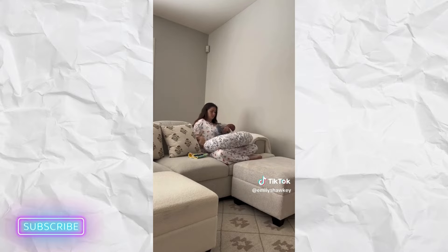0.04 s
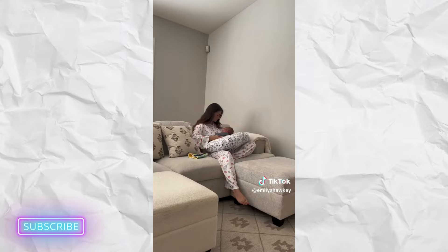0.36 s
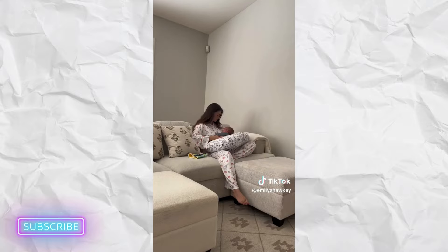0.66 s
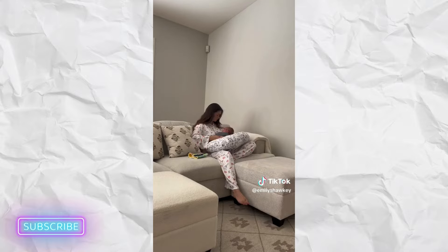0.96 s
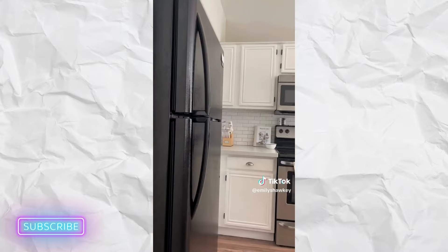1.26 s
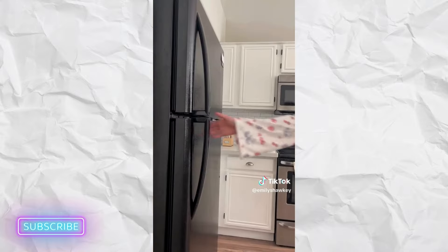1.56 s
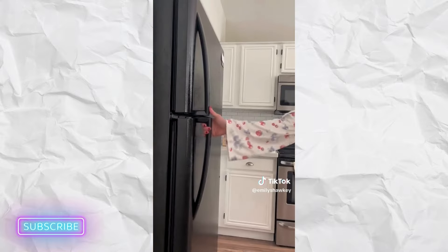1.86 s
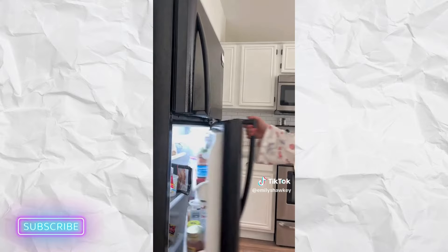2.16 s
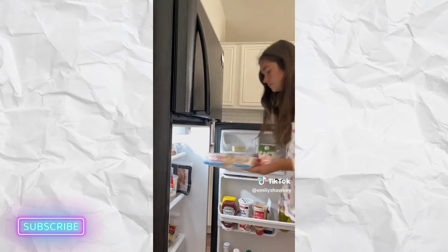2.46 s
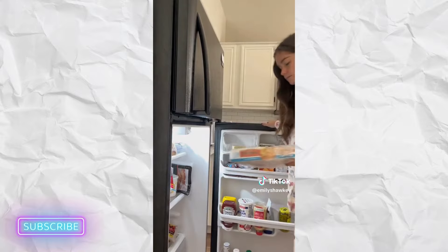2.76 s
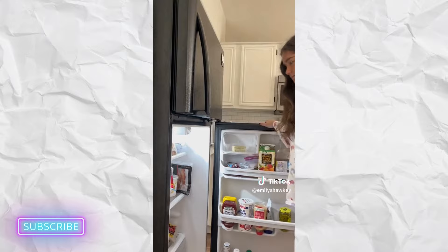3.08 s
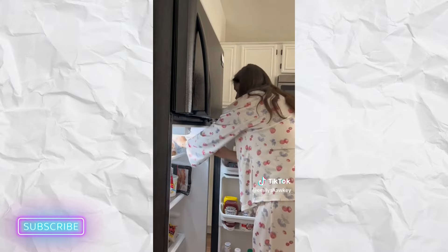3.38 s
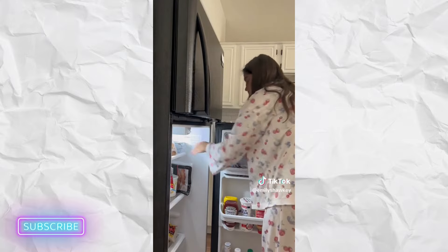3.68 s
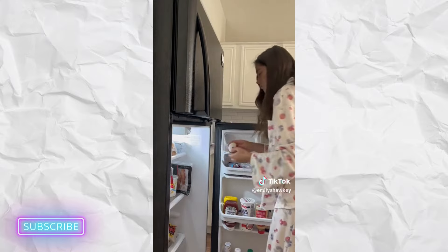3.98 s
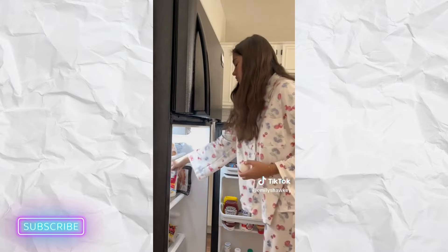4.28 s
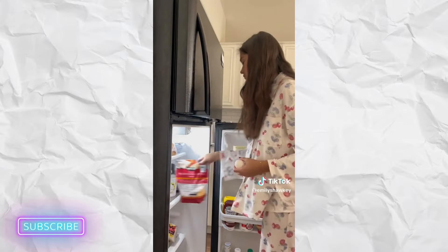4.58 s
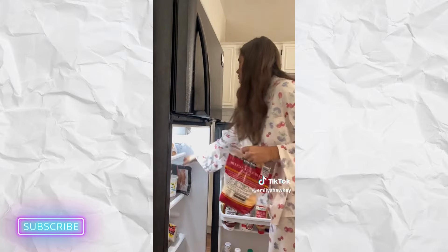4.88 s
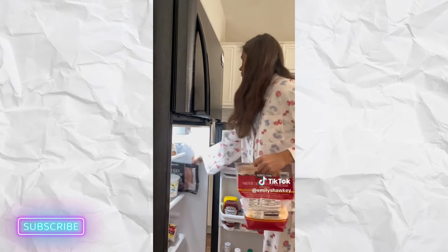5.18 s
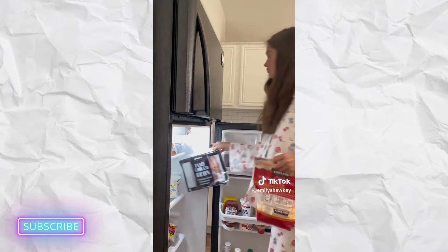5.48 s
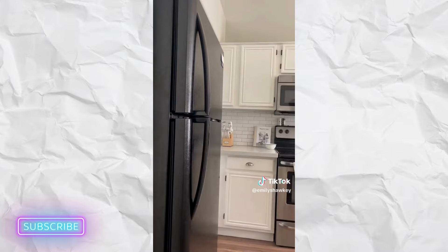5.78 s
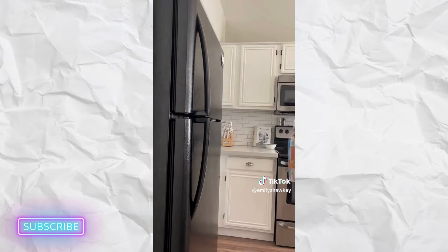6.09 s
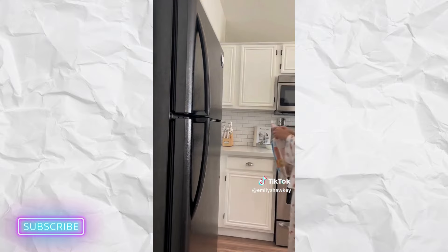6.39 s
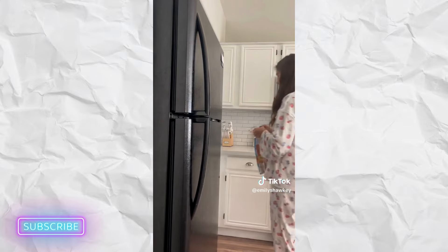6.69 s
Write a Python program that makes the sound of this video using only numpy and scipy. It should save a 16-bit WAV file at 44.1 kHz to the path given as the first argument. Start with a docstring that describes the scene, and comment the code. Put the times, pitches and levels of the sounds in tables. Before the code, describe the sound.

After a faint room hum, a fridge opens with a thud, followed by shelf knocks, crackling bags and rustling clothes.

```python
"""A living room hums for a second, then gives way to a tiled kitchen where a refrigerator is raided.
A hand grips the handle, the rubber seal peels and pops, and the door booms. A tray chatters along its rack,
tubs knock on ringing plastic shelves, a jar clinks and food bags crackle as their film buckles.
Sleeves rustle in fine slips of cotton, and every movement carries the ring of the hard room."""
import sys
import numpy as np
from scipy import signal
from scipy.fft import rfft, irfft, next_fast_len
from scipy.io import wavfile
from scipy.ndimage import uniform_filter1d

SR = 44100
rng = np.random.default_rng(int(sys.argv[2]) if len(sys.argv) > 2 else 0)


def unload_wav(signal):
    """Save mono or channel-first audio to the path in sys.argv[1] as 16-bit WAV at rate SR, clipped to [-1, 1]."""
    wavfile.write(
        sys.argv[1],
        SR,
        np.round(np.clip(np.atleast_2d(signal).T, -1, 1) * 32767).astype(np.int16),
    )


N = 306131
TIME = np.arange(N) / SR

# abrupt steps in the room tone; the kitchen begins at the third (start [s], level [dB])
AIR_STEPS = [(0, -55), (0.101, -61), (1.03, -59.5), (2.3, -61), (3.139, -62.5), (4.035, -57.5), (4.87, -57),
             (5.744, -64)]


def undb(db):
    """Decibels to gain."""
    return 10 ** (np.asarray(db) / 20)


def unit(x):
    """Scale to rms 1."""
    return x / np.sqrt(np.mean(x ** 2))


def on_log(hz, points):
    """Read (frequency [Hz], value) points on a log-frequency axis."""
    point_hz, value = np.transpose(points)
    return np.interp(np.log(np.maximum(hz, 1)), np.log(point_hz), value)


def colour(x, points):
    """EQ by a curve of (frequency [Hz], gain [dB]) points."""
    size = next_fast_len(len(x))
    gain = undb(on_log(np.fft.rfftfreq(size, 1 / SR), points))
    return irfft(rfft(x, size) * gain, size)[:len(x)]


def band(x, lo_hz, hi_hz, order=3):
    """Causal band-pass."""
    sos = signal.butter(order, [lo_hz, min(hi_hz, SR / 2 - 1)], "band", fs=SR, output="sos")
    return signal.sosfilt(sos, x)


def walk(rate_hz):
    """Smooth random drift at rms 1."""
    size = int(SR / rate_hz)
    steps = np.repeat(rng.standard_normal(N // size + 1), size)
    return unit(uniform_filter1d(steps, size)[:N])


def fade(t60, rise):
    """One second of a hit's envelope: it builds during contact and dies away."""
    t = TIME[:SR]
    return (1 - np.exp(-t / rise)) * np.exp(-np.log(1000) * t / t60)


def ring(modes, rise, detune):
    """Struck modes; each point of contact detunes and weights them a little."""
    chance = rng.standard_normal((len(modes), 2))
    return sum(undb(db + stray_db) * fade(t60, rise)
               * np.sin(2 * np.pi * hz * (1 + detune * drift) * TIME[:SR])
               for (hz, db, t60), (drift, stray_db) in zip(modes, chance))


def burst(lo_hz, hi_hz, t60, rise):
    """A crowd of short modes: a band of noise that dies away evenly."""
    noise = band(rng.standard_normal(SR), lo_hz, hi_hz)
    return noise / np.sqrt(uniform_filter1d(noise ** 2, size=SR // 50)) * fade(t60, rise)


def add_hit(track, s, hit, db):
    """Mix in a hit at time s, with its first 20 ms at an rms level of db."""
    start = max(int(s * SR), 0)
    attack_rms = np.sqrt(np.mean(hit[:SR // 50] ** 2))
    track[start:start + len(hit)] += hit[:N - start] * undb(db) / attack_rms


def grains(per_s, spread_db, size=N):
    """Tiny slips and buckles at random moments, uneven in size."""
    size_db = spread_db * np.minimum(rng.exponential(size=size), 4)
    return (rng.random(size) < per_s / SR) * rng.choice([-1, 1], size) * undb(size_db)


def stroke(s, rise, hold, db, release_db_per_s):
    """Envelope of one rub: it swells, holds and dies, choked by any room-tone step over 60 ms in."""
    speed = np.clip((TIME - s) / rise, 0, 1)
    fall_db = release_db_per_s * np.maximum(TIME - s - rise - hold, 0)
    end = min([step for step, _ in AIR_STEPS if step > s + .06] + [np.inf])
    return speed * undb(db - fall_db) * (TIME < end)


def rubbing(strokes, spectrum, release_db_per_s, per_s, spread_db, hiss_db, scrape_db):
    """One stream of grains heard as dull scrape, crackle and fine hiss; bright strokes favour the hiss."""
    slips = colour(grains(per_s, spread_db), spectrum)
    gains = [(stroke(*shape, release_db_per_s), bright_db) for *shape, bright_db in strokes]
    layers = [(0.066, 317, 2500, scrape_db), (0.4, 2380, 5560, 0), (1, 6170, 14400, hiss_db)]
    out = np.zeros(N)
    for bright_share, lo_hz, hi_hz, db in layers:
        power = sum((gain * undb(db + bright_share * bright_db)) ** 2 for gain, bright_db in gains)
        out += unit(band(slips, lo_hz, hi_hz, order=5)) * np.sqrt(power)
    return out


def air():
    """Ventilation hums in the living room; then kitchen air takes over, with the compressor's drone."""
    # room tone of each room (frequency [Hz], spectral level [dB])
    lounge_spectrum = [(18, -66), (30, -20), (59, -5), (93, -8.5), (149, -16.5), (234, -7.5), (272, -12.5),
                       (485, -13), (623, -26.5), (1150, -32), (1500, -25), (2100, -33.5), (2600, -47),
                       (4900, -48), (5800, -55.5), (12000, -59), (15600, -59)]
    kitchen_spectrum = [(25, -4.5), (52, -1.5), (80, -3), (150, -11), (280, -7.5), (420, -14), (600, -28),
                        (1000, -24.5), (1600, -24), (2100, -28), (2600, -40.5), (5000, -42.5),
                        (15000, -51.5)]
    compressor_hz, compressor_db = 48.5, -71.5
    starts, air_db = np.transpose(AIR_STEPS)
    gain = undb(air_db[np.searchsorted(starts[1:], TIME)])
    lounge = unit(colour(rng.standard_normal(N), lounge_spectrum)) * gain
    for hum_hz, db in [(118.4, -69.5), (156, -64.5), (188.4, -62.5), (236.9, -62.5), (355.3, -76)]:
        lounge += np.sqrt(2) * undb(db) * np.sin(2 * np.pi * hum_hz * TIME + 1.96 * walk(7.82))
    kitchen = unit(colour(rng.standard_normal(N), kitchen_spectrum)) * gain
    kitchen += np.sqrt(2) * undb(compressor_db) * np.sin(2 * np.pi * compressor_hz * TIME + walk(1.6))
    return np.where(TIME < starts[2], lounge, kitchen)


def shuffles():
    """Sofa cushions and a hand shift about, rubbing in a broad resonance that differs with each touch."""
    # soft rubs (start [s], rise [s], hold [s], level [dB], resonance [Hz])
    rubs = [(0, 0.0029, 0.0089, -38, 126), (1.018, 0.026, 0.08, -50.5, 738),
            (1.157, 0.037, 0.024, -56, 655), (1.274, 0.0054, 0.0084, -46, 599),
            (5.6, 0.011, 0.015, -55, 500)]
    out = np.zeros(N)
    for s, rise, hold, db, hz in rubs:
        roughness = unit(band(rng.standard_normal(N), 4.7, 0.27 * hz, order=2))
        out += roughness * np.sin(2 * np.pi * hz * TIME) * stroke(s, rise, hold, db, release_db_per_s=288)
    return out


def cloth():
    """Cotton brushes on cotton in dense, fine slips that come in swishes, with a few coarser catches."""
    # sleeve and pyjama moves (start [s], rise [s], hold [s], level [dB], brightness [dB])
    moves = [(0, 0.084, 0.012, -62.5, -8), (1.035, 0.011, 0.025, -70, -1.5), (1.24, 0.0016, 0.0069, -60, 0),
             (1.35, 0.11, .02, -70.5, -4), (1.563, 0.0052, 0.014, -54.5, -6.5),
             (2.3, 0.0033, 0.015, -49, -7), (2.35, 0.053, 0.13, -60.5, 5.5),
             (2.58, 0.024, 0.12, -63.5, -2.5), (2.733, 0.0081, 0.0092, -47.5, -9.5),
             (2.8, 0.032, 0.022, -51, -7.5), (2.95, 0.053, 0.055, -74, 5.5),
             (5.5, 0.013, 0.0068, -56.5, -8.5), (5.6, 0.028, 0.011, -62, 3.5),
             (5.742, 0.003, 0.032, -55.5, -1.5), (5.82, 0.044, 0.032, -58.5, 0.5),
             (6.07, 0.061, 0.022, -59.5, 2), (6.23, 0.034, .01, -66, 4), (6.38, 0.061, 0.0082, -58.5, 0.5),
             (6.48, 0.096, 0.11, -60.5, -4.5), (6.68, 0.061, 0.061, -61, 4), (6.8, 0.083, 0.14, -61, -5.5)]
    spectrum = [(400, -4.5), (1400, -5.5), (5000, 0), (8500, -3.5), (10500, -9), (15000, -9)]
    slips = rubbing(moves, spectrum, release_db_per_s=118, per_s=6000, spread_db=1, hiss_db=-2,
                    scrape_db=-1)
    catches = rubbing(moves, spectrum, release_db_per_s=118, per_s=45, spread_db=1.5, hiss_db=-5,
                      scrape_db=1)
    swish = undb(1.2 * walk(18))
    return swish * (undb(-1) * slips + undb(-12.5) * catches)


def clicks():
    """Hard plastic ticks: a dull clack, a crack, the ring of the thin wall and a bright snap on top."""
    # plastic contacts (time [s], level [dB], brightness [dB], base t60 [s])
    contacts = [(1.238, -59, 2.5, 0.024), (1.251, -59, 5, 0.021), (1.284, -57.5, 0, 0.013),
                (1.568, -56, -5.5, 0.11), (1.781, -51.5, -1, 0.03), (1.8827, -37.5, 2.5, 0.028),
                (2.0151, -40, -5.5, 0.04), (2.128, -53, -8.5, 0.048), (2.4892, -54.5, 9, 0.025),
                (2.592, -55.5, 4.5, 0.028), (3.114, -55, 0, 0.03), (3.2492, -48.5, -8, 0.085),
                (3.2964, -44, -5.5, 0.12), (3.455, -51, -7.5, 0.076), (4.2144, -40, 1.5, 0.17),
                (4.711, -41, 11, 0.031), (4.92, -42.5, 1.5, 0.02), (5.2133, -38.5, 3.5, 0.035),
                (5.2944, -46, -5.5, 0.038), (5.322, -43, 0.5, 0.065), (5.374, -52.5, -7, 0.039),
                (6.12, -59.5, -1.5, 0.0094), (6.2052, -52.5, 4, 0.014), (6.439, -60.5, -3, .025)]
    # ring of the thin bins and racks (frequency [Hz], level [dB], t60 [s])
    plastic_modes = [(797, -1, 0.06), (1203, 4.5, 0.072), (1371, 6, 0.051), (2027, 6, 0.037),
                     (2854, 2.5, 0.028), (4400, -26, 0.021), (5147, 9.5, 0.017)]
    out = np.zeros(N)
    for s, db, bright_db, t60 in contacts:
        add_hit(out, s, burst(536, 2110, t60 * 1.48, rise=0.0018), db + 1 - bright_db)
        add_hit(out, s, burst(2130, 4970, t60 * 1.57, rise=0.0017), db + 0.5)
        add_hit(out, s, ring(plastic_modes, rise=0.0012, detune=0.013), db - 0.5 - 0.2 * bright_db)
        add_hit(out, s, burst(4140, 13200, t60 * 3.2, rise=0.00033), db - 6.5 + bright_db)
    return out


def door():
    """Handle and seal knock the door: the liner rings, the outer panel thuds, the whole door booms."""
    # blows on the door (time [s], liner knock [dB], panel thud [dB], boom [dB])
    blows = [(1.246, -53, -50.5, -44.5), (1.577, -47.5, -43.5, -41), (1.604, -46, -45, -55),
             (1.769, -44, -55, -51), (1.801, -37, -34, -43), (1.833, -43, -36, -48),
             (1.857, -40.5, -45, -52), (1.889, -27.5, -43, -62), (1.897, -18.5, -27, -32),
             (1.933, -40, -33, -48), (1.988, -40, -36.5, -35), (2.022, -30, -49, -58),
             (2.141, -43.5, -59, -42)]
    # ring of the liner and of the outer panel (frequency [Hz], level [dB], t60 [s])
    liner_modes = [(178, -2.5, 0.17), (224.3, -2, 0.14), (258, 10.5, 0.035), (338, 11.5, 0.044),
                   (383, -0.5, 0.11), (475, -4, 0.12), (485, 5, 0.043), (564, -7, 0.093), (791, -15, 0.23)]
    panel_modes = [(102.2, -2.5, 0.2), (133, -5, 0.11), (166.5, 2, 0.15)]
    boom_hz, boom_t60 = 54.6, 0.28
    out = np.zeros(N)
    for s, knock_db, thud_db, boom_db in blows:
        tilt_db_per_octave = 0.9 * (thud_db - knock_db)  # soft blows lean towards the bass
        panel = [(hz, db - tilt_db_per_octave * np.log2(hz / panel_modes[0][0]), t60)
                 for hz, db, t60 in panel_modes]
        add_hit(out, s, ring(liner_modes, rise=0.002, detune=0.0062), knock_db)
        add_hit(out, s, burst(192, 566, t60=0.28, rise=0.0072), knock_db - 8.5)
        add_hit(out, s, ring(panel, rise=0.0055, detune=0.0083), thud_db)
        add_hit(out, s, ring([(boom_hz, 0, boom_t60)], rise=0.0041, detune=0.0071), boom_db)
    return out


def hollow_tones():
    """Something hollow is touched softly and sounds one short note each time."""
    # soft touches (time [s], level [dB], pitch [Hz], t60 [s])
    touches = [(1.445, -58, 543, 0.087), (1.494, -53, 580, 0.081)]
    out = np.zeros(N)
    for s, db, hz, t60 in touches:
        add_hit(out, s, ring([(hz, 0, t60)], rise=0.002, detune=0.0033), db)
    return out


def seal():
    """The magnetic rubber gasket lets go of the frame bit by bit."""
    # the peel (start [s], rise [s], hold [s], level [dB], brightness [dB])
    peel = [(1.725, 0.16, 0.054, -47, -1)]
    spectrum = [(500, 1), (1500, -5.5), (5000, -4), (15000, -17)]
    return rubbing(peel, spectrum, release_db_per_s=177, per_s=8100, spread_db=-0.5, hiss_db=-4,
                   scrape_db=5.5)


def tray():
    """A tray chatters over the door rack; its upper resonances bite only at the height of the push."""
    # pushes on the tray (start [s], rise [s], hold [s], level [dB])
    pushes = [(2.682, 0.012, 0.086, -51), (2.717, 0.019, 0.0036, -40)]
    # body of the tray (frequency [Hz], width [Hz], level [dB])
    resonances = [(865, 200, 2.5), (1306, 92, -3.5), (1566, 72, -2.5), (2440, 90, -13), (3000, 120, -5.5)]
    chatter = grains(per_s=2300, spread_db=-6.5)
    push = sum(stroke(*shape, release_db_per_s=263) for shape in pushes)
    body = np.zeros(N)
    for hz, width, db in resonances:
        tone = unit(band(chatter, hz - width / 2, hz + width / 2, order=2))
        octaves_up = np.log2(hz / resonances[0][0])
        body += undb(db) * tone * (push / push.max()) ** octaves_up
    return body * push / np.sqrt(sum(undb(db) ** 2 for _, _, db in resonances))


def shelves():
    """A tub or packet stirs the shelf modes nearest its own pitch, then the cabinet and its walls."""
    # goods set down or lifted (time [s], level [dB], pitch [Hz], cabinet relative to knock [dB])
    knocks = [(2.814, -43, 344, -18), (2.869, -53, 474, -9), (3.165, -48.5, 402, -4),
              (3.252, -34, 504, -19), (3.302, -30, 317, -18), (3.317, -33.5, 405, -7),
              (3.367, -45, 302, 0.5), (3.459, -38, 275, -4), (3.49, -40, 257, -5), (3.54, -45, 235.6, -8),
              (4.213, -37, 280, -9.5), (4.244, -39, 628, -5.5), (4.522, -49.5, 373, -12),
              (4.564, -55.5, 348, -3.5), (4.642, -50, 385, -21), (4.713, -43, 340, -10.5),
              (4.986, -47.5, 500, -1.5), (5.228, -36.5, 314, -2), (5.262, -42, 280, 2.5),
              (5.305, -45, 332, -1), (5.502, -49, 515, -20), (5.65, -53, 483, -27), (6.205, -50, 585, -14),
              (6.439, -58, 380, -22)]
    # ring of the shelves and of the hollow cabinet behind them (frequency [Hz], level [dB], t60 [s])
    shelf_modes = [(232.5, -10, 0.35), (281.5, 7, 0.083), (335.7, -6.5, 0.19), (409.4, 1.5, 0.077),
                   (463.5, -1, 0.13), (499.6, -4, 0.12), (576, 8.5, 0.038), (620, -12, 0.033),
                   (910, -3, 0.07)]
    cabinet_modes = [(130.8, -6.5, 0.25), (163.6, -2, 0.23), (178, -2.5, 0.26)]
    out = np.zeros(N)
    for s, db, pitch_hz, hollow_db in knocks:
        stirred = [(hz, mode_db - 9 * np.log2(hz / pitch_hz) ** 2, t60) for hz, mode_db, t60 in shelf_modes]
        add_hit(out, s, ring(stirred, rise=0.0032, detune=0.015), db)
        add_hit(out, s, burst(pitch_hz / 1.6, pitch_hz * 1.5, t60=0.055, rise=0.0014), db - 3)
        add_hit(out, s, ring(cabinet_modes, rise=0.0085, detune=0.012), db + hollow_db)
        add_hit(out, s, burst(48, 125, t60=0.33, rise=0.01), db + hollow_db - 5)
    return out


def jar():
    """A full jar meets its neighbour twice with a short, choked clink."""
    # clinks (time [s], level [dB])
    clinks = [(3.246, -42), (3.296, -39)]
    # damped ring of the jar (frequency [Hz], level [dB], t60 [s])
    jar_modes = [(2040, -4, 0.05), (3030, -5, 0.028), (3324, -2, 0.028), (3440, -12, 0.029)]
    out = np.zeros(N)
    for s, db in clinks:
        add_hit(out, s, ring(jar_modes, rise=0.0021, detune=0.0018), db)
    return out


def bags():
    """Plastic film buckles in uneven flurries; larger facets snap through in bands of their own."""
    # tugs on the food bags (start [s], rise [s], hold [s], level [dB], brightness [dB])
    tugs = [(4.036, 0.062, 0.13, -57, -0.5), (4.186, 0.012, 0.031, -45, 4.5),
            (4.305, 0.024, 0.13, -64, 8.5), (4.463, 0.027, 0.047, -55, -1),
            (4.694, 0.0035, 0.01, -53.5, -2), (4.87, 0.035, 0.014, -59.5, -1.5),
            (4.965, 0.0094, 0.028, -48.5, 1), (5.012, 0.019, 0.13, -53, 3),
            (5.147, 0.041, 0.024, -45, -3.5), (5.254, 0.022, 0.095, -47.5, 1)]
    # tone of the film (frequency [Hz], gain [dB])
    spectrum = [(400, 2), (900, 0), (1360, 0), (2000, -2.5), (2800, -6), (3700, -7), (4900, -5.5),
                (6000, -11), (7500, -9), (10500, -20.5), (13000, -17.5), (15500, -20)]
    release_db_per_s = 140
    film = rubbing(tugs, spectrum, release_db_per_s, per_s=2100, spread_db=0, hiss_db=-5.5, scrape_db=2.5)
    edges = np.geomspace(1100, 15000, 7)
    facets = sum(band(grains(per_s=28, spread_db=2), lo, hi, order=2) for lo, hi in zip(edges, edges[1:]))
    pull = np.sqrt(sum(stroke(*shape, release_db_per_s) ** 2 for *shape, _ in tugs))
    flurries = undb(3 * walk(80))
    return undb(-1) * film * flurries + undb(-3) * unit(colour(facets, spectrum)) * pull


def creases():
    """A crease runs across the film as a quick shower of snaps that ring one facet at its own pitch."""
    # single creases giving way (time [s], level [dB], brightness [dB], t60 [s])
    buckles = [(4.1047, -50.5, -11, 0.028), (4.163, -39.5, 1, 0.072), (4.227, -50, -5, 0.065),
               (4.249, -45, 4, .06), (4.405, -43.5, 3, 0.058), (4.5094, -53, 3, 0.028),
               (4.978, -43, 3.5, 0.053), (4.9922, -43.5, 5, 0.05), (5.0116, -41.5, -3, 0.036),
               (5.1244, -50, -8, 0.053), (5.136, -52, -2, 0.048), (5.167, -48, -15, 0.035),
               (5.1839, -53, -9, 0.039), (5.2298, -38, 2.5, 0.067), (5.245, -49, 5, 0.027),
               (5.28, -50, -9, 0.027)]
    out = np.zeros(N)
    for s, db, bright_db, t60 in buckles:
        snaps = grains(per_s=2600, spread_db=2.2, size=SR) * fade(t60, rise=0.0012)
        facet_hz = 2990 * 2 ** (0.84 * rng.uniform(-0.99, 1))
        add_hit(out, s, band(snaps, facet_hz / 0.99, facet_hz * 1.13, order=1), db - 7.5)
        add_hit(out, s, band(snaps, 770, 3160), db - 5.5 - 0.57 * bright_db)
        add_hit(out, s, band(snaps, 3260, 5370), db - 5.5)
        add_hit(out, s, band(snaps, 6850, 9760), db - 9.5 + bright_db)
        add_hit(out, s, band(snaps, 12000, 15000), db - 16.5 + 2 * bright_db)
    return out


def whiten(response):
    """Even out a room response so that it favours no pitch."""
    spectrum = rfft(response, 2 * SR)
    power = np.abs(spectrum) ** 2
    smooth_power = uniform_filter1d(power, size=160) + 1e-4 * np.mean(power)
    return unit(irfft(spectrum / np.sqrt(smooth_power))[:SR])


def room(x, early_db, late_db):
    """Quick reflections from door and cupboards, then the diffuse ring of the kitchen."""
    # decay of the tail (frequency [Hz], t60 [s])
    decay = [(60, 1.83), (250, 0.35), (1000, 1.04), (3000, 0.8), (6000, 0.47), (14000, 0.2)]
    # tone of the reverb (frequency [Hz], gain [dB])
    tone = [(50, -12), (200, -1), (1000, -4), (4000, -7.5), (8000, -5), (14000, -11)]
    edges = np.geomspace(30, 20000, 10)
    late = sum(band(rng.standard_normal(SR), lo, hi) * fade(on_log(np.sqrt(lo * hi), decay), rise=0.00053)
               for lo, hi in zip(edges, edges[1:]))
    early = rng.standard_normal(SR) * fade(t60=0.057, rise=0.0003)
    response = undb(early_db) * unit(early) + undb(late_db) * unit(late)
    flat = whiten(response) * np.std(response) / np.sqrt(SR)
    return signal.fftconvolve(x, colour(flat, tone))[:N]


def placed(x, early_db, late_db):
    """Mid and side of a source straight ahead, with reflections from its own spot in the room."""
    return np.array([undb(-4) * x + room(x, early_db, late_db), room(x, early_db, late_db)])


def scene():
    """All the action sits dead centre; only reflections and room tone have width."""
    # stereo width: EQ of the side channel (frequency [Hz], gain [dB])
    width = [(60, -27.5), (125, -25.5), (250, -15), (500, -5.5), (1000, -3.5), (2000, -6.5), (4800, 2),
             (7000, -7), (14000, -29)]
    mid, side = (placed(door() + hollow_tones(), early_db=-20, late_db=-8)
                 + placed(shelves() + tray() + shuffles(), early_db=-10, late_db=-7)
                 + placed(clicks(), early_db=-5.5, late_db=-4.5)
                 + placed(jar(), early_db=-3.5, late_db=-10)
                 + placed(bags() + creases() + seal(), early_db=-1.5, late_db=-12)
                 + placed(cloth(), early_db=-1.5, late_db=-17.5)
                 + np.array([air(), air()]))
    side = colour(side, width)
    return np.array([mid + side, mid - side])


def record(dry):
    """The level dips briefly at each room-tone step; the deepest bass and the very top are cut off."""
    low_cut_hz, high_cut_hz = 34, 15900
    dips = np.prod([1 - .7 * np.exp(-((TIME - s) / .006) ** 4) for s, _ in AIR_STEPS[1:]], axis=0)
    thinned = signal.sosfilt(signal.butter(2, low_cut_hz, "high", fs=SR, output="sos"), dry * dips)
    return signal.sosfilt(signal.ellip(8, .2, 70, high_cut_hz, fs=SR, output="sos"), thinned)


dry = scene()
out = record(dry)
unload_wav(out)
```